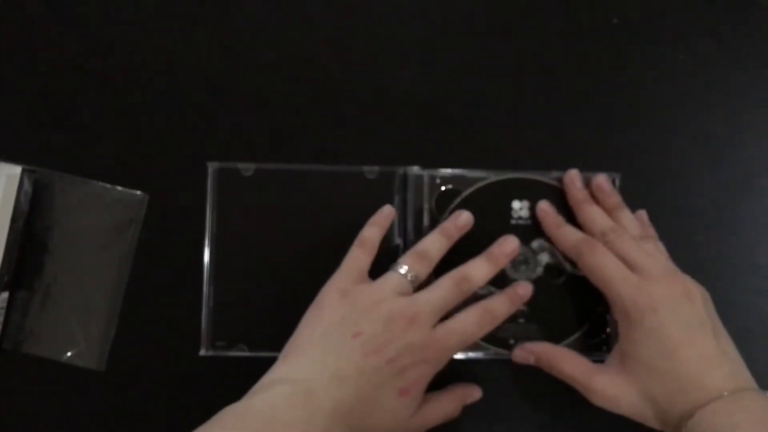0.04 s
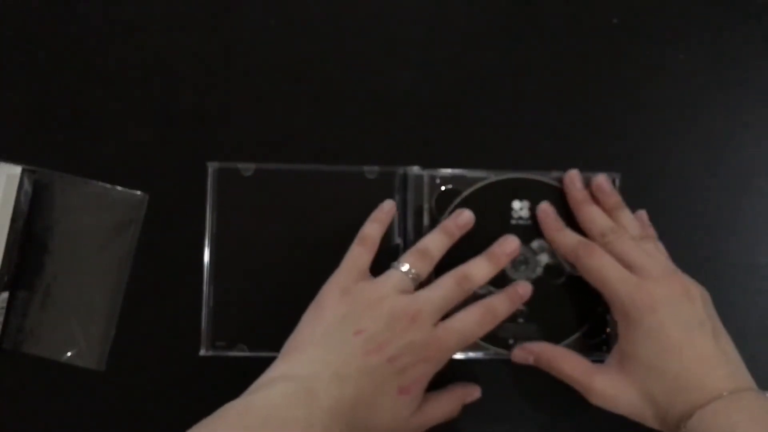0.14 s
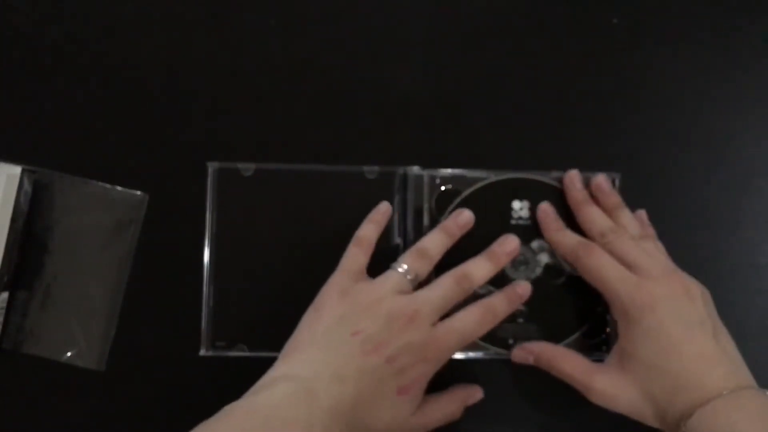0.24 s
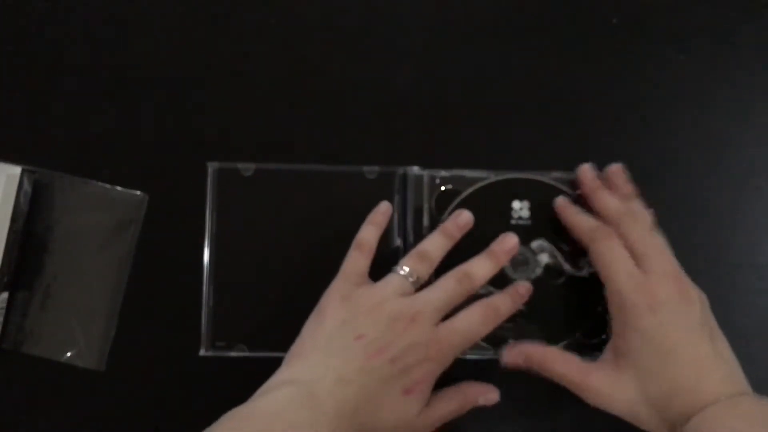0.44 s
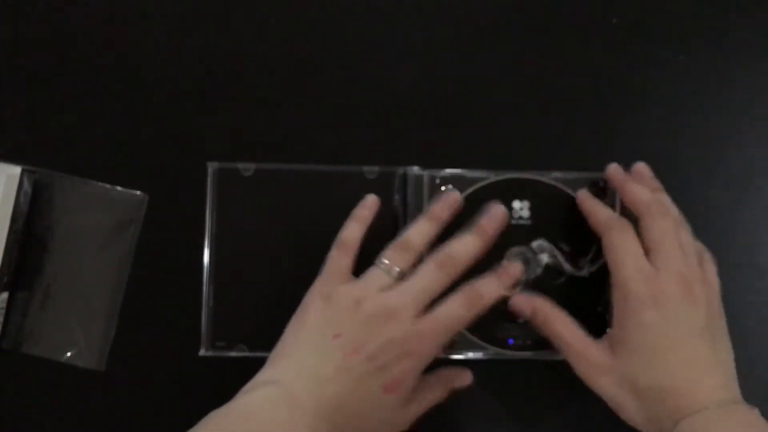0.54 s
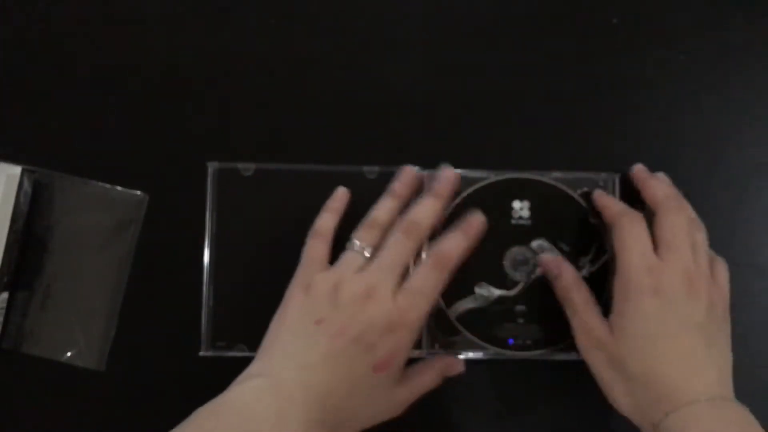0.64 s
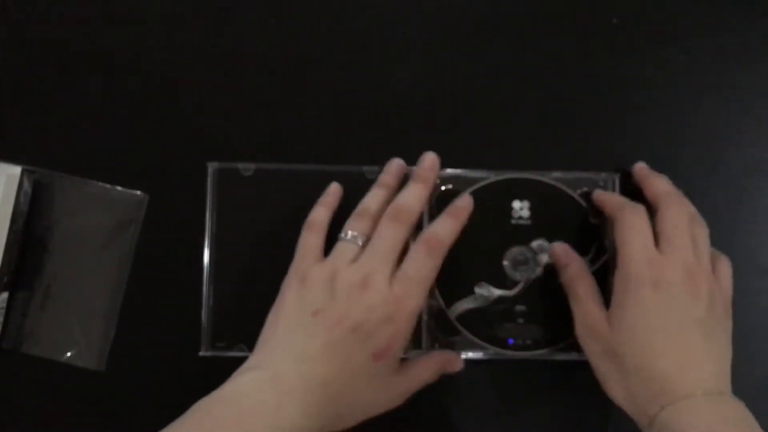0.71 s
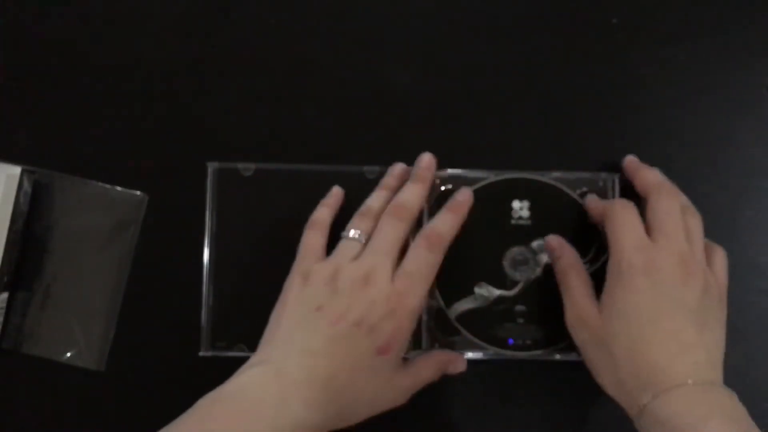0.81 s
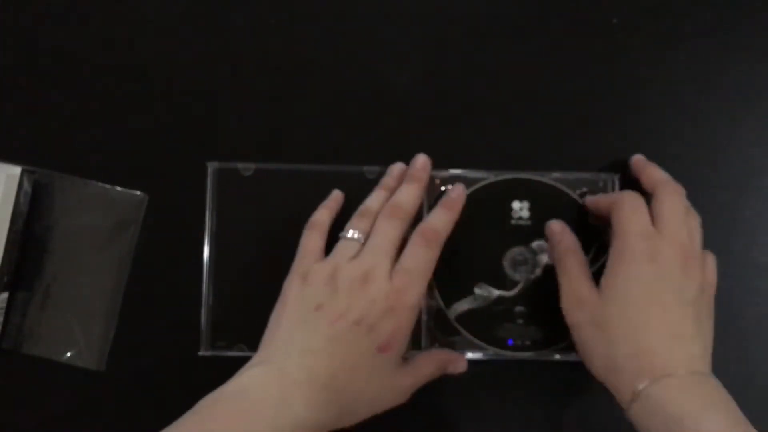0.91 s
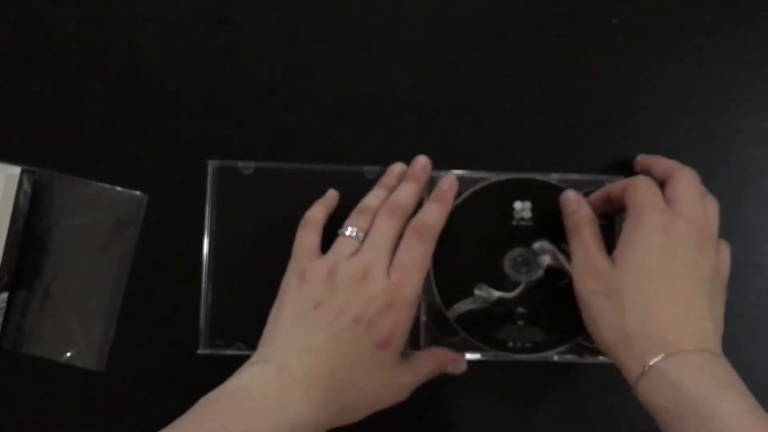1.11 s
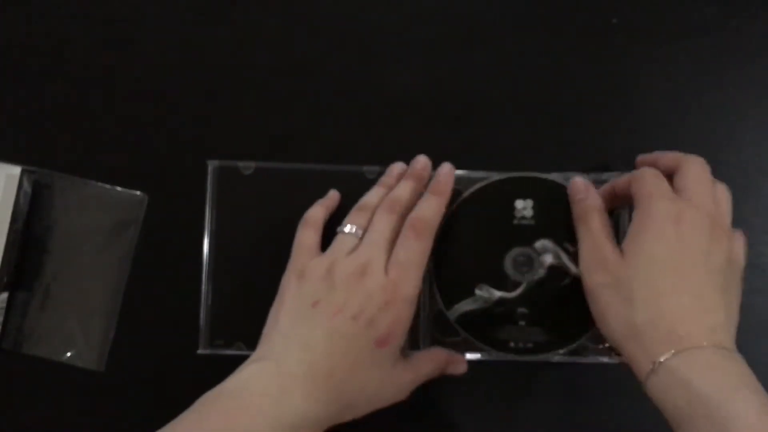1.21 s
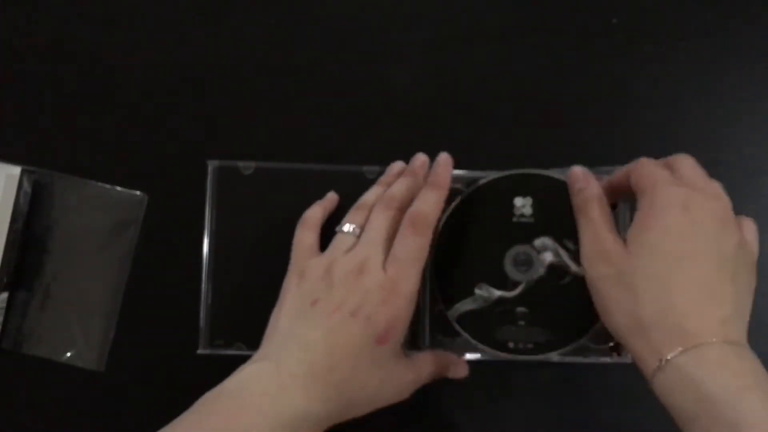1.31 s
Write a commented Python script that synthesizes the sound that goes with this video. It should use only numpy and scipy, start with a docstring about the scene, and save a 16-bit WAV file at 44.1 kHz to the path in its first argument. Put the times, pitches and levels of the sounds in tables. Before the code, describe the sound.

A disc snaps into a plastic case: after faint finger sliding and a tiny tick at 0.12 s, a loud gritty crack bursts at 0.21 s, with bright ringing teeth, hollow tray resonance and a low table thump. Fingers slide softly until 0.6 s, with a small squeak. Light taps follow around 0.85 s, rim juddering from 1.0 s, a scuff near 1.19 s and a faint touch at 1.34 s. Close, quiet room, low rumble.

```python
"""First comes a soft rumble with fingers sliding on a disc, in a small quiet room. Then the disc snaps
onto the hub of a clear plastic case: short pushes with gritty cracks ring the plastic, tray and table,
and the teeth of the hub ring in turn. The fingers slide off, tap the case twice, judder along its rim and
scuff the edge, all as filtered noise apart from the taps, which are more pushes.
Small squeaks are narrow bands of noise, and faint high whistles are wavering sine tones."""
import sys
import numpy as np
from scipy import signal
from scipy.fft import rfft, irfft
from scipy.io import wavfile
from scipy.ndimage import uniform_filter1d

SR = 44100
rng = np.random.default_rng(int(sys.argv[2]) if len(sys.argv) > 2 else 0)


def pcm_store(signal):
    """Save signal as 16-bit PCM."""
    levels = np.round(np.clip(np.atleast_2d(signal), -1, 1) * 32767)
    wavfile.write(sys.argv[1], SR, levels.astype(np.int16).T)


N = 59535  # length of the sound in samples
T = np.arange(N) / SR  # time of each sample in seconds

# "Fade time" means the time to die away by 60 dB.
# Tone of the low rumble: (frequency [Hz], relative level [dB])
RUMBLE_COLOUR = [(25, -3.5), (45, -3.5), (62, 5), (85, 3), (120, -7), (300, -14), (600, -20.5), (1500, -27),
                 (5000, -35.5), (15000, -38)]
RUMBLE_DB = -59
# Echo of the room in bands: (lowest frequency [Hz], highest frequency [Hz], level [dB], fade time [s])
ROOM_BANDS = [(132.5, 493, -9.5, .42), (510, 1040, -9, 0.36), (1000, 2000, -7.5, 0.5),
              (2000, 4420, -8.5, 0.47), (4000, 6600, -9, 0.44), (6000, 8900, -9.5, 0.45),
              (9510, 15000, -14, 0.44)]
ROOM_DELAY_S = .006  # the echo starts after this delay and takes as long again to build up
# Faint thin tones: (start [s], length [s], start pitch [Hz], end pitch [Hz], arch of pitch [Hz], level [dB])
WHISTLES = [(.01, 0.14, 14100, 14600, -700, -80), (0.043, .04, 15750, 15600, -5, -68),
            (0.153, 0.094, 13300, 12700, 2, -75), (.505, 0.034, 13700, 12600, 148, -73),
            (.71, .085, 13050, 12650, 547, -79)]
WHISTLE_WAVER_HZ = 169
# Skin catching on the disc: (time [s], half length [s], frequency [Hz], level [dB])
SQUEAKS = [(0.081, 0.0044, 3170, -63), (0.553, .008, 3380, -61), (1.3425, .002, 3630, -58)]
SQUEAK_WIDTH = 0.085  # share of the frequency, to each side
# Fingers sliding off the disc: (time [s], level [dB])
SLIDE = [(0, -62), (.03, -71.5), (.13, -70.5), (.19, -67), (.22, -62), (.42, -61.5), (.50, -59.5),
         (.555, -56.5), (.612, -62), (.625, -92), (.70, -92.5), (1.29, -89.5), (1.312, -64), (1.35, -69)]
# Tone of the slide: (frequency [Hz], relative level [dB])
SLIDE_COLOUR = [(70, 16), (140, 1.5), (330, 8.5), (600, 1.5), (1500, -2), (2700, -4), (3400, 2), (5000, -5),
                (9000, -5), (13000, -6), (16000, -9.5)]
# Fingertip juddering along the rim: (time [s], level [dB], slip rate [slips per s])
JUDDER = [(1.004, -70, 230), (1.01, -60.5, 230), (1.033, -60, 220), (1.082, -64, 170), (1.141, -65, 130),
          (1.161, -77, 130), (1.17, -51, 120), (1.181, -74.5, 320), (1.23, -76, 67), (1.25, -90, 200)]
# Tone of the judder: (frequency [Hz], relative level [dB])
JUDDER_COLOUR = [(200, 3.5), (800, -5), (2100, 4), (4500, -3.5), (7000, 1), (8300, -3), (9200, 7),
                 (10400, -5), (15500, -2.5)]
SLIP_DECAY, SLIP_JITTER = 0.78, 0.28  # fading of each slip in cycles; wandering as a share of the rate
# Finger scuffing the edge: (time [s], level [dB])
SCUFF = [(1.163, -107), (1.172, -62), (1.18, -54), (1.188, -52), (1.196, -54), (1.203, -61), (1.225, -64.5),
         (1.24, -95.5)]
# Tone of the scuff: (frequency [Hz], relative level [dB])
SCUFF_COLOUR = [(88, -12.5), (150, -10.5), (371, -17), (545, -9), (900, -7.5), (1070, -7.5), (3210, -9.5),
                (5100, -22), (15000, -26)]
# Ringing of the hub's teeth: (frequency [Hz], relative level [dB], fade time [s])
HUB_TEETH = [(4460, -7.5, 0.012), (4706, 1, 0.0067), (8550, -3.5, 0.011), (11070, -4, 0.011),
             (11700, -2.5, 0.0059), (15040, -7.5, .005)]
HUB_S, TOOTH_GAP_S = .2126, .0002  # first tooth springs free; wait until each next tooth
HUB_DB, HUB_SCATTER_DB = 3, -0.5  # heard directly; click thrown into the room
# Contacts with the case, before the plastic shares below:
# (time [s], plastic push [dB], treble edge [Hz], tray push [dB], table push [dB])
CONTACTS = [(.120, -49, 4800, -52, -53), (.2080, -18, 3750, -19.5, -29), (.2102, -15, 11900, -20, -23.5),
            (0.2122, -9, 18300, -17, -15), (0.2132, -1, 13600, 1, -2.5), (.2160, -10.5, 8600, -17.5, -38),
            (.2180, -17, 4180, -19, -27), (.725, -54.5, 8220, -40.5, -51), (.8362, -30.5, 12200, -37, -45),
            (.8380, -35, 981, -24.5, -44.5), (.8625, -27, 13800, -28.5, -26.5),
            (.8655, -50, 3960, -25, -39.5), (0.868, -38, 4000, -31, -14), (1.012, -40, 14800, -47, -45),
            (1.153, -38, 13100, -48, -52.5), (1.178, -39.5, 5000, -30, -44),
            (1.1922, -29.5, 4280, -29, -25), (1.3415, -44, 6070, -34.5, -39)]
# Ringing of the disc and shell: (frequency [Hz], relative level [dB], fade time [s])
PLASTIC = [(771, -4, 0.012), (1165, -11.5, 0.025), (1438, -5, 0.016), (1870, -8, 0.0039),
           (2284, -3.5, 0.014), (2794, -9.5, .015), (3137, -4.5, .014), (3617, -11, 0.029),
           (3860, -10.5, 0.01), (6030, -11, .003), (7160, -3.5, .005), (9040, -6.5, 0.0021),
           (12100, -3.5, 0.0011), (15300, -7.5, 0.003)]
# Ringing of the hollow tray: (frequency [Hz], relative level [dB], fade time [s])
TRAY = [(201.1, -4.5, 0.12), (252.3, 0.5, .09), (342.4, -0.5, 0.078), (439.7, -5.5, 0.088),
        (545, -15, 0.26), (681.6, -14, .2), (766, -15, 0.15), (856, -17, 0.081)]
TABLE_HZ, TABLE_T60_S = 86, 0.24  # pitch and fade time of the table
CRACK_S, CRACK_DB = .0014, 9.5  # grit after a contact: time to fall to 37 %, level against the push
PLASTIC_DB, BARE_DB = -2, -7.5  # shares of the contact that ring the plastic and that do not ring
SCATTER_DB = -3  # share of the contact thrown into the room
LOW_CUT_HZ, TOP_HZ = 48, 16000  # limits of the finished sound


def undb(db):
    """Turn decibels into a gain."""
    return 10 ** (np.asarray(db) / 20)


def unit(x):
    """Scale to unit energy."""
    return x / np.sqrt(np.sum(x ** 2))


def level(x):
    """Scale to an average strength (rms) of 1."""
    return unit(x) * np.sqrt(N)


def convolve(x, response):
    """Let a sound set off a response at every moment."""
    return signal.fftconvolve(x, response)[:N]


def cut(x, hz, kind, order):
    """Keep only what lies below ("low") or above ("high") a frequency."""
    sos = signal.butter(order, min(hz, SR / 2 - 20), kind, fs=SR, output="sos")
    return signal.sosfilt(sos, x)


def colour(x, points):
    """Shape the tone through (frequency, level) points, without sounding early; the result has rms 1."""
    hz, db = np.array(points).T
    size = 2 * N
    log_hz = np.log(np.fft.rfftfreq(size, 1 / SR) + 1)
    gain_db = np.interp(log_hz, np.log(hz), db)
    # folding the cepstrum forward in time makes the filter respond only after its input
    cepstrum = irfft(np.log(undb(gain_db)))
    cepstrum[1:N] *= 2
    cepstrum[N + 1:] = 0
    response = np.exp(rfft(cepstrum))
    return level(irfft(rfft(x, size) * response)[:N])


def fade(t60):
    """Decay by 60 dB in t60 seconds."""
    return np.exp(-np.log(1000) * T / t60)


def ring(modes):
    """Ring like a struck object: a sum of fading tones, each weighted by its energy."""
    total = np.zeros(N)
    for hz, db, t60 in modes:
        tone = np.cos(2 * np.pi * hz * T) * fade(t60)
        total += undb(db) * unit(tone)
    return unit(total)


def swell(curve):
    """Gain along (time, level) points, silent before them and practically silent after."""
    rows = np.array(curve)
    return undb(np.interp(T, rows[:, 0], rows[:, 1], left=-np.inf, right=-200))


def grit(spread_db):
    """Dense tiny clicks of uneven size."""
    clicks = rng.standard_normal(N)
    size_db = spread_db * np.minimum(rng.exponential(size=N), 5)
    return clicks * undb(size_db)


def wander(size):
    """Random drift smoothed over some samples, with rms 1."""
    return level(uniform_filter1d(rng.standard_normal(N), size=size))


def rumble():
    """A low steady rumble: random noise with a tone that is strongest in the bass."""
    return undb(RUMBLE_DB) * colour(rng.standard_normal(N), RUMBLE_COLOUR)


def room(x):
    """Diffuse echo: each band stores the energy it gets and gives it back as a fading wash of noise."""
    out = np.zeros(N)
    for low_hz, high_hz, db, t60 in ROOM_BANDS:
        band = signal.butter(3, [low_hz, min(high_hz, SR / 2 - 20)], "band", fs=SR, output="sos")
        build_up = np.clip(T / ROOM_DELAY_S - 1, 0, 1)
        tail = unit(fade(t60) * build_up)
        energy = np.abs(convolve(signal.sosfilt(band, x) ** 2, tail ** 2))
        wash = unit(signal.sosfilt(band, rng.standard_normal(N)))
        out += undb(db) * np.sqrt(energy * N) * wash
    return out


def whistles():
    """Very high, faint sine tones that swell and fade while their pitch bends and wavers."""
    out = np.zeros(N)
    for start_s, length_s, start_hz, end_hz, arch_hz, db in WHISTLES:
        progress = np.clip((T - start_s) / length_s, 0, 1)
        arch = np.sin(np.pi * progress)
        hz = start_hz + (end_hz - start_hz) * progress + arch_hz * arch
        hz = hz + WHISTLE_WAVER_HZ * wander(size=40)
        out += undb(db) * arch * np.sin(2 * np.pi * np.cumsum(hz) / SR)
    return out


def squeaks():
    """Brief catches of the skin on the disc, each a narrow gritty band."""
    out = np.zeros(N)
    for time_s, half_s, hz, db in SQUEAKS:
        band = cut(grit(spread_db=2), hz * (1 + SQUEAK_WIDTH), "low", order=6)
        band = cut(band, hz * (1 - SQUEAK_WIDTH), "high", order=6)
        bump = np.exp(-((T - time_s) / half_s) ** 2)
        out += undb(db) * bump * level(band)
    return out


def slide():
    """Skin slides smoothly over the disc, making many tiny clicks."""
    return swell(SLIDE) * colour(grit(spread_db=4), SLIDE_COLOUR)


def judder():
    """A fingertip sticks and slips on the rim: each slip is a burst of grit that dies down."""
    time_s, _, rate = np.array(JUDDER).T
    slip_rate = np.interp(T, time_s, rate) * (1 + SLIP_JITTER * wander(size=250))
    phase = np.cumsum(slip_rate) / SR % 1  # place within the present slip, from 0 to 1
    slips = grit(spread_db=4.5) * np.exp(-phase / SLIP_DECAY)
    return swell(JUDDER) * colour(slips, JUDDER_COLOUR)


def scuff():
    """A finger scuffs the edge of the case in a short rush of grit."""
    return swell(SCUFF) * colour(grit(spread_db=4), SCUFF_COLOUR)


def hub():
    """The teeth spring free in turn, each ringing briefly: (direct, thrown into the room)."""
    teeth = np.zeros(N)
    for k, (hz, db, t60) in enumerate(HUB_TEETH[::-1]):
        start = int((HUB_S + k * TOOTH_GAP_S) * SR)
        teeth += undb(db) * np.roll(ring([(hz, 0, t60)]), start)
    click = signal.unit_impulse(N, int(HUB_S * SR))
    return undb(HUB_DB) * unit(teeth), undb(HUB_SCATTER_DB) * click


def contacts():
    """Sharp pushes with gritty cracks ring plastic, tray and table: (direct, thrown into the room)."""
    sharp, tray, table = np.zeros((3, N))
    push = signal.unit_impulse(N)
    for time_s, db, edge_hz, tray_db, table_db in CONTACTS:
        at = int(time_s * SR)
        crumble = unit(rng.standard_normal(N) * np.exp(-T / CRACK_S))
        crack = cut(push + undb(CRACK_DB) * crumble, edge_hz, "low", order=3)
        sharp[at:] += undb(db) * unit(crack)[:N - at]
        tray[at] += undb(tray_db)
        table[at] += undb(table_db)
    sharp = cut(sharp, 230, "high", order=2)
    plastic = undb(PLASTIC_DB) * convolve(sharp, ring(PLASTIC)) + undb(BARE_DB) * sharp
    table_ring = ring([(TABLE_HZ, 0, TABLE_T60_S)])
    body = convolve(tray, ring(TRAY)) + convolve(table, table_ring)
    return plastic + body, undb(SCATTER_DB) * sharp + .5 * plastic + body


def scene():
    """The case and the fingers sound directly and through the room, over the rumble and whistles."""
    snap_and_taps = np.array(contacts()) + np.array(hub())
    fingers = slide() + judder() + scuff() + squeaks()
    direct, thrown = snap_and_taps + fingers
    background = rumble()
    return (direct + whistles() + room(thrown) + background)[None]


def record(dry):
    """Filters take away the deep bass and the very top."""
    thin = cut(dry, LOW_CUT_HZ, "high", order=3)
    return signal.sosfilt(signal.ellip(8, .2, 70, TOP_HZ, fs=SR, output="sos"), thin)


dry = scene()
out = record(dry)
pcm_store(out)
```